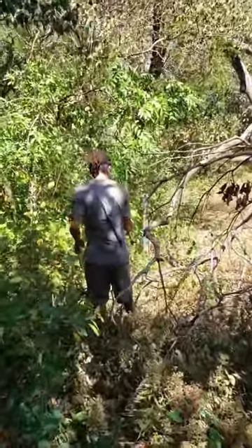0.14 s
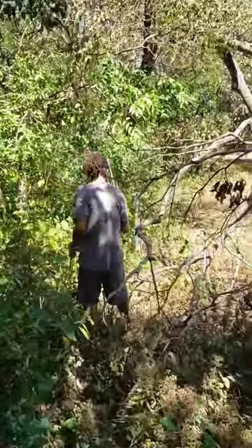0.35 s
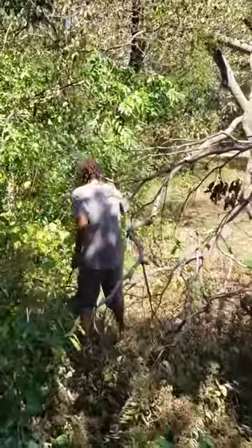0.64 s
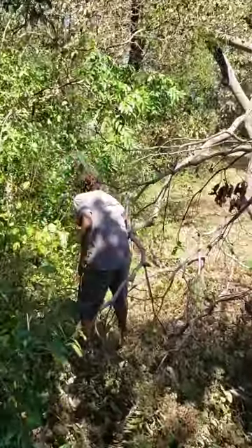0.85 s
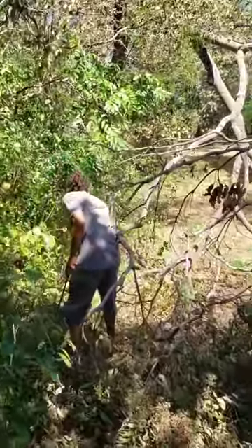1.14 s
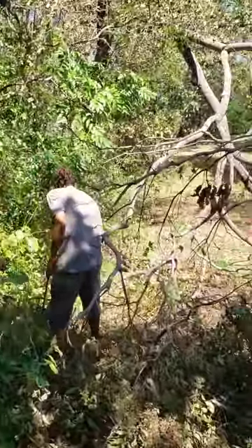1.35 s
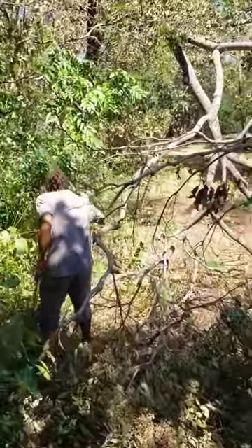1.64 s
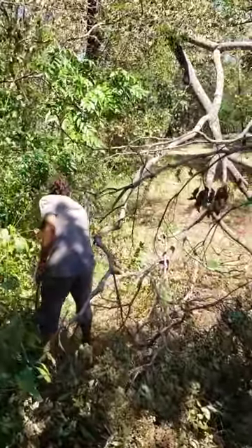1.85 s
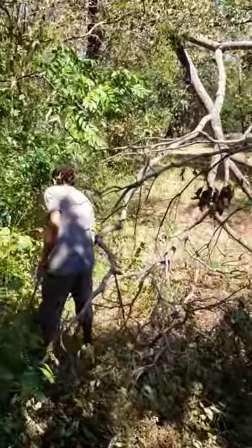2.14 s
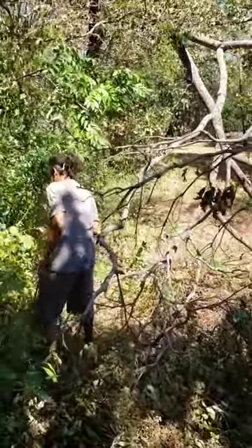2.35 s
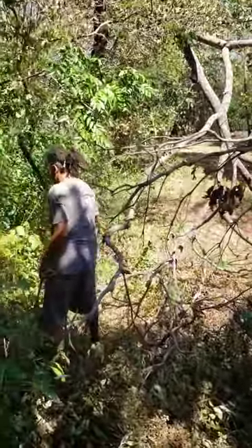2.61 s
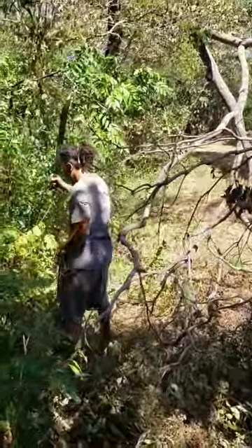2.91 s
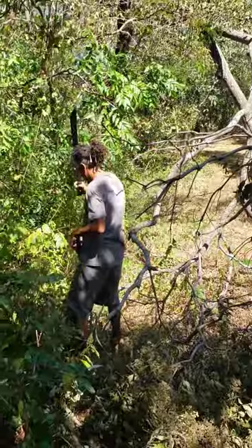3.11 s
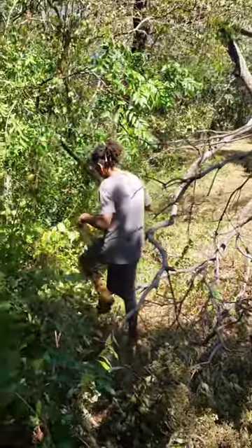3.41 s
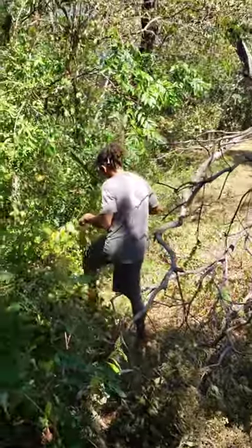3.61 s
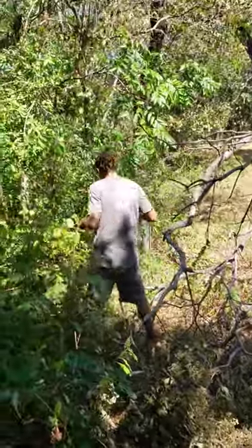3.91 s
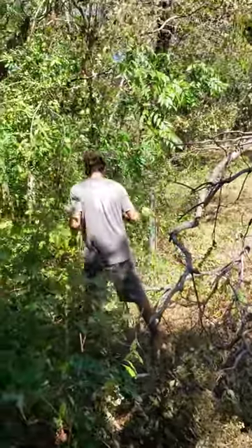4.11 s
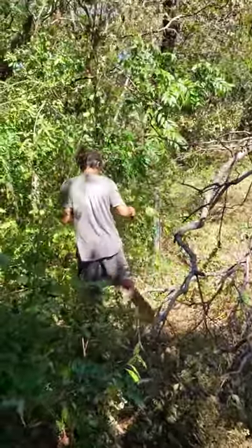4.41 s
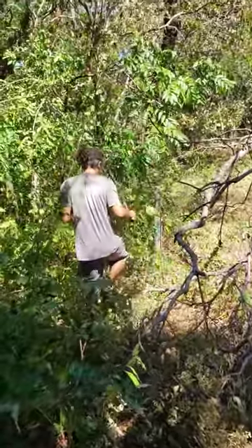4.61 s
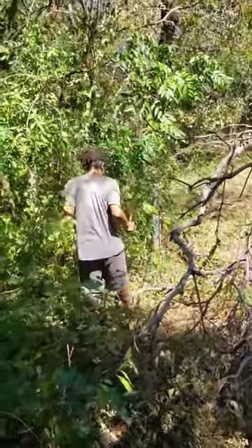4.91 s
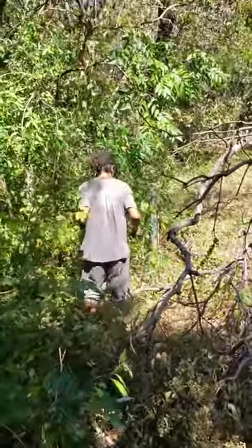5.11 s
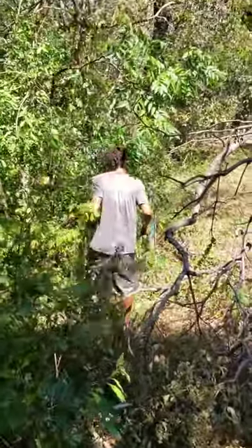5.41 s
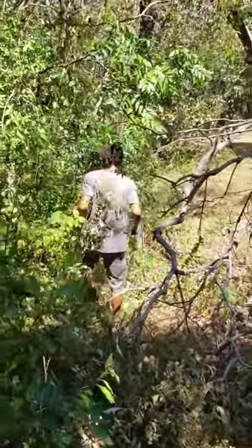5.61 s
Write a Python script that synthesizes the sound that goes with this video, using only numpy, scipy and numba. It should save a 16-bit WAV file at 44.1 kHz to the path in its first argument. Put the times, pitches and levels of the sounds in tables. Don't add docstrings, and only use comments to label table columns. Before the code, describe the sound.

A dry outdoor woodland heard through a handheld phone's two microphones, with faint airy hush and low wind buffeting, mostly on the right. From 0 to 0.8 s, leaves crunch underfoot and fine twigs tick, with one bright snap ahead near 0.15 s. A strong crunch at 0.9 s leads into a blade blow at 1.0 s: splintering crack, woody knock and low thump, with only weak metal ring. Crunching continues, peaking in a loud short burst at 1.63 s. At 1.9 s a lighter, sharper blow scatters splinters and the steel rings high and clear, its brighter part fading after about 2.4 s. It is calmer until brush and twig snaps around 3.0 to 3.1 s. Brush rustles at 3.4 s and a very sharp twig cracks at 3.73 s. From 4.2 to 5.1 s close treads crackle densely with brittle stems; another leafy crunch comes at 5.45 s, ending in small rustles and a wind bump.

```python
import sys
import numpy as np
from scipy import signal
from scipy.fft import rfft, irfft
from scipy.io import wavfile
from scipy.ndimage import uniform_filter1d
from numba import njit

SR = 44100
rng = np.random.default_rng(int(sys.argv[2]) if len(sys.argv) > 2 else 0)


def store_pcm(level_fs):
    pcm = np.round(np.clip(level_fs, -1, 1) * 32767).astype(np.int16)
    wavfile.write(sys.argv[1], SR, np.atleast_2d(pcm).T)


def makeup_ratio(level_db):
    decades = np.asarray(level_db, float) / 20
    return 10 ** decades


N = 253575
TIME = np.arange(N) / SR
LAG_BELOW, LAG_AHEAD = 22, 5


def unit(x):
    return x / np.sqrt(np.mean(x ** 2))


def colour(x, points):
    hz, db = np.transpose(points)
    grid_hz = np.linspace(1, SR / 2, 1025)
    log_gain = np.interp(np.log(grid_hz), np.log(hz), db) * np.log(10) / 20
    cepstrum = irfft(log_gain)
    cepstrum[1:1024] *= 2
    cepstrum[1025:] = 0
    response = irfft(np.exp(rfft(cepstrum)))
    return signal.fftconvolve(x, response)[:N]


def band(x, low_hz, high_hz):
    edges = [low_hz, min(high_hz, .45 * SR)]
    return signal.sosfilt(signal.butter(2, edges, "band", fs=SR, output="sos"), x)


@njit
def ring(start, hz, cycles, size, length):
    out = np.zeros(length)
    for k in range(len(start)):
        step = (2j * np.pi - np.log(1000) / cycles[k]) * hz[k] / SR
        first = int(start[k]) + 1
        z, turn = size[k] * np.exp(step * (first - start[k])), np.exp(step)
        last = first + int(cycles[k] * SR / hz[k]) + 1
        for i in range(max(first, 0), min(last, length)):
            out[i] += z.imag
            z *= turn
    return out


def heard(s, hz, cycles, size, lag, length=N):
    cycles = cycles + 0. * hz
    left = ring(s * SR + lag, hz, cycles, size, length)
    right = ring(s * SR, hz, cycles, size, length)
    return np.array([left, right])


def swells(rows, rest_db):
    s, db, rise, fall = np.transpose(rows)[:, :, None]
    t = TIME[::64]
    level = db - 20 * np.maximum((s - t) / rise, (t - s) / fall)
    power = np.sum(makeup_ratio(2 * level), axis=0) + makeup_ratio(2 * rest_db)
    return np.interp(TIME, t, 10 * np.log10(power))


def crackle(count, low_hz, high_hz, cycles, spread_db, lag, scatter):
    when, pitch, chance = rng.random((count, 3)).T
    hz = low_hz + (high_hz - low_hz) * pitch
    size = makeup_ratio(-spread_db * np.log(1.002 - chance)) * np.sqrt(hz) * rng.choice([-1, 1], count)
    lags = lag + scatter * rng.standard_normal(count)
    return unit(heard(when * N / SR, hz, cycles, size, lags))


def rustle(effort, lag, scatter, tread_hz, stalk_db, stalk_slope, thud_db, thud_slope):
    held = np.repeat(rng.standard_normal(N // 500 + 1), 500)[:N]
    flicker = unit(uniform_filter1d(held, size=400))
    leaves = crackle(count=60000, low_hz=3670, high_hz=17800, cycles=11.0, spread_db=2.5,
                     lag=lag, scatter=scatter)
    stalks = crackle(count=14000, low_hz=960, high_hz=4000, cycles=18.5, spread_db=1.0,
                     lag=lag, scatter=scatter)
    tread = crackle(count=5000, low_hz=tread_hz, high_hz=1137, cycles=4.9, spread_db=1.5,
                    lag=lag, scatter=scatter)

    def level(db, slope):
        return makeup_ratio(db + slope * (effort + 40) + 0.65 * flicker)

    return (level(-46, 1) * band(leaves, 2970, 13950)
            + level(stalk_db, stalk_slope) * band(stalks, 750, 6800)
            + level(thud_db, thud_slope) * band(tread, 0.43 * tread_hz, 1560))


def burst(s, db, centre_hz, octaves, t60, cycles, lag, count, rise=1e-4, spread_db=-0.42):
    when, pitch, chance = rng.random((count, 3)).T
    after = t60 * when ** 1.2
    hz = np.clip(centre_hz * 2 ** (octaves * (2 * pitch - 1)), 40, 16500)
    size = makeup_ratio(db - 60 * after / t60 - spread_db * np.log(1 - chance)) * rng.choice([-1, 1], count)
    size *= (1 - np.exp(-after / rise - .05)) * (hz / centre_hz) ** .5
    return s + after, hz, np.full(count, cycles), size, lag + 1.7 * rng.standard_normal(count)


def peak_at(grains, db, width):
    x = heard(*grains, length=2048)
    return x * makeup_ratio(db) / np.sqrt(uniform_filter1d(np.mean(x ** 2, axis=0), size=width).max())


def snaps(rows, lag, ms):
    out = np.zeros((2, N + 2048))
    for s, db, hz, knock_db in rows:
        crack_grains = burst(0, 0, hz, .7, ms * .0045, 10.0, lag, count=60, rise=.0004)
        crack = peak_at(crack_grains, db, width=40)
        knock_grains = burst(0, 0, 520, .8, .008, 5.0, lag, count=8)
        knock = peak_at(knock_grains, db + knock_db, width=130)
        first = int(s * SR)
        out[:, first:first + 2048] += crack + knock
    return out[:, :N]


def stray_twigs(effort, count, over_db, low_hz, high_hz):
    when, strength, pitch = rng.random((count, 3)).T
    s = when * N / SR
    db = np.interp(s, TIME, effort) + over_db + 4.0 * strength
    return list(zip(s, db, low_hz * (high_hz / low_hz) ** pitch, -18 - 22 * pitch))


def thicket(x, t60, wet_db):
    t = TIME[:SR // 4]
    tails = rng.standard_normal((2, len(t))) * makeup_ratio(-60 * t / t60) * (1 - np.exp(-t / 0.0053))
    tails /= np.sqrt(np.sum(tails ** 2, axis=1, keepdims=True))
    return x + makeup_ratio(wet_db) * signal.fftconvolve(x, tails, axes=1)[:, :N]


# (frequency [Hz], gain [dB]); the right one resonates most for sound from below
LEFT_PORT = [(100, -6), (1000, -4.5), (3000, 2), (7200, -2.5), (9000, 1), (12000, 2.5), (15500, 9.5)]
RIGHT_PORT_BELOW = [(100, -3), (2500, 2.5), (4000, 6), (6200, 3.5), (7300, -3), (9000, 0), (11600, 10.5),
                    (13300, 3.5), (15400, 22)]
RIGHT_PORT_AHEAD = [(100, -4.5), (2500, -2), (4500, 2), (6000, 6), (7300, -4), (9000, 3.5), (11000, 7.5),
                    (13300, 4.5), (15300, 13)]


def ports(x, from_below):
    right = RIGHT_PORT_BELOW if from_below else RIGHT_PORT_AHEAD
    return np.array([colour(x[0], LEFT_PORT), colour(x[1], right)])


# (frequency [Hz], spectral level [dB per Hz])
AIR_SPECTRUM = [(40, -19), (100, 1.5), (300, -6.5), (700, 2), (1500, -24), (4000, -8.5), (9000, -4.5),
                (15500, 4.5)]


def air():
    shared, left, right = (colour(n, AIR_SPECTRUM) for n in rng.standard_normal((3, N)))
    bass = makeup_ratio(16.5) * band(shared, 120, 260)
    treble = np.array([band(left, 260, 28000), band(right, 230, 21000)])
    return makeup_ratio(-67) * unit(bass + treble)


# (crest time [s], level [dB], 20 dB swell [s], 20 dB fade [s])
WIND_GUSTS = [(.06, -59, .5, .1), (.32, -46, .13, .1), (.4, -56, .2, .5), (1.0, -54, .07, .3),
              (1.1, -48, .2, .3), (1.34, -50, .07, .06), (1.71, -53, .2, .12), (1.92, -46, .05, .1),
              (2.1, -54, .03, .04), (2.19, -46.5, .03, .2), (2.45, -49.5, .05, .18), (3.09, -46, .03, .07),
              (3.27, -58.5, .04, .6), (3.92, -59, .04, .25), (5.08, -59.5, .5, .15), (5.57, -59, .03, .16),
              (5.72, -46, .06, .12)]


def wind():
    shared, left, right = (unit(band(band(n, 30, 104), 33, 184)) for n in rng.standard_normal((3, N)))
    gust = makeup_ratio(swells(WIND_GUSTS, rest_db=-68))
    at_left = makeup_ratio(-11.5) * shared + makeup_ratio(-12) * left
    at_right = makeup_ratio(-2) * shared + makeup_ratio(-14) * right
    return gust * np.array([at_left, at_right])


# (crest time [s], leaf level [dB], 20 dB swell [s], 20 dB fade [s])
TREAD_EFFORTS = [(0.0, -45, .05, .15), (.169, -33, .12, .25), (.296, -31.5, .25, .2), (.45, -45, .2, .4),
                 (.67, -50, .2, .3), (.917, -25.5, .09, .13), (1.075, -30, .2, .4), (1.194, -36, .2, .2),
                 (1.33, -35, .15, .2), (1.456, -35, .4, .11), (1.585, -30, .03, .1),
                 (1.629, -19.5, .07, .05), (1.7, -45, .1, .2), (2.0, -40, .1, .4), (2.4, -52, .5, .5),
                 (2.83, -53, .1, .3), (3.099, -33, .05, .25), (3.2, -44, .2, .5), (3.53, -52, .2, .15),
                 (4.185, -39, .15, .3), (4.286, -36, .3, .15), (4.547, -35, .2, .14), (4.663, -33, .05, .5),
                 (4.85, -40, .3, .25), (5.025, -33, .13, .12), (5.171, -39, .2, .13),
                 (5.448, -28.5, .32, .13), (5.58, -45, .2, .3)]
# (time [s], peak level [dB], centre [Hz], knock re peak [dB])
TWIGS_UNDERFOOT = [(.0688, -29, 10300, -40), (.0826, -30, 11000, -29), (.3622, -33, 9900, -40),
                   (.4353, -34, 12000, -40), (.5231, -32, 11100, -35), (.6004, -30, 7600, -36),
                   (.6533, -35, 6100, -16), (.6692, -32, 3000, -14), (.7381, -29, 11100, -31),
                   (.7653, -31, 9700, -22), (1.1287, -22, 5500, -27), (1.1975, -24, 9400, -28),
                   (1.2058, -26, 11800, -26), (1.4482, -28, 8900, -35), (1.5639, -31, 8500, -40),
                   (3.0882, -23, 9100, -15), (3.1606, -32, 4500, -32), (3.4993, -32, 6400, -27),
                   (4.2202, -31, 4300, -14), (4.2673, -30, 3400, -25), (4.281, -29, 4700, -23),
                   (4.3022, -24, 4100, -18), (4.3384, -30, 5000, -26), (4.4414, -32, 4800, -21),
                   (4.4693, -31, 3600, -11), (4.6467, -24, 5300, -25), (4.7143, -27, 4900, -27),
                   (4.8739, -28, 5700, -27), (5.0126, -25, 3700, -40), (5.0236, -24, 4700, -27)]
# (time [s], peak level [dB], centre [Hz])
MORE_TWIGS_UNDERFOOT = [(4.4057, -33, 6500), (4.4167, -35, 7300), (4.4995, -32, 7900), (4.5105, -32, 6200),
                        (4.5474, -30, 5700), (4.5833, -32, 8400), (4.601, -32, 7100), (4.6195, -34, 5100),
                        (4.6599, -27, 4700), (4.733, -30, 5500), (4.7993, -27, 8400), (4.8108, -31, 7200),
                        (4.8537, -29, 4500), (4.9041, -31, 8500), (4.945, -33, 5000), (4.9527, -30, 5200),
                        (5.0296, -23, 9100), (5.0338, -27, 5100), (5.0957, -32, 12000), (5.5097, -33, 4400)]


def treads_underfoot():
    effort = swells(TREAD_EFFORTS, rest_db=-68)
    more_twigs = [(*stem, -22) for stem in MORE_TWIGS_UNDERFOOT]
    strays = stray_twigs(effort, count=60, over_db=4.0, low_hz=4000, high_hz=11500)
    litter = rustle(effort, LAG_BELOW, 1.0, tread_hz=410, stalk_db=-55, stalk_slope=1.1,
                    thud_db=-59, thud_slope=.7)
    twigs = snaps([*TWIGS_UNDERFOOT, *more_twigs, *strays], LAG_BELOW, ms=1.9)
    return makeup_ratio(1.0) * litter + makeup_ratio(-4) * twigs


# (crest time [s], leaf level [dB], 20 dB swell [s], 20 dB fade [s])
BRUSH_PUSHES = [(.1, -43, .1, .1), (.17, -39, .1, .4), (.5, -49, .3, .3), (.785, -46, .15, .25),
                (1.1, -38, .1, .4), (1.984, -39.5, .07, .5), (2.3, -53, .5, .8), (2.585, -41, .17, .12),
                (2.74, -55, .2, .2), (2.822, -51, .05, .2), (3.03, -43, .15, .2), (3.22, -42, .2, .5),
                (3.385, -37.5, .09, .07), (3.554, -50, .2, .06), (3.637, -43, .04, .3),
                (3.741, -34.5, .09, .18), (3.829, -38, .15, .8), (4.05, -43, .4, .4), (4.39, -53, .3, .3),
                (5.0, -42, .2, .2), (5.31, -41, .13, .3), (5.44, -37, .2, .2), (5.68, -44, .1, .15),
                (5.74, -43, .09, .2)]
# (time [s], peak level [dB], centre [Hz], knock re peak [dB])
TWIGS_IN_BRUSH = [(.1576, -21, 9800, -37), (.834, -36, 9000, -30), (1.8575, -49, 9200, -40),
                  (2.5208, -42, 2700, -19), (2.5841, -28, 6000, -30), (2.6921, -39, 5700, -40),
                  (2.8116, -41, 9700, -40), (2.9523, -41, 9800, -40), (3.0042, -38, 9600, -40),
                  (3.0204, -26, 9800, -25), (3.0366, -24, 10400, -26), (3.2297, -32, 10600, -30),
                  (3.4407, -39, 11700, -40), (3.5422, -33, 10500, -40), (3.5893, -35, 8300, -31),
                  (3.644, -33, 8000, -20), (3.7333, -16, 8500, -21), (3.9024, -38, 3700, -12),
                  (4.1099, -33, 10100, -40), (5.3104, -30, 9400, -16), (5.7277, -36, 8000, -29)]


def walker_ahead():
    effort = swells(BRUSH_PUSHES, rest_db=-68)
    strays = stray_twigs(effort, count=30, over_db=4.0, low_hz=5000, high_hz=11500)
    brush = rustle(effort, LAG_AHEAD, 2.1, tread_hz=139, stalk_db=-61, stalk_slope=.95,
                   thud_db=-61, thud_slope=.55)
    twigs = snaps([*TWIGS_IN_BRUSH, *strays], LAG_AHEAD, ms=2.4)
    return makeup_ratio(5.5) * brush + makeup_ratio(-1.5) * twigs


# (time [s], splinter level [dB], splinter T60 [s], knock level [dB], thump level [dB])
BLOWS = [
    (1, -20.5, 0.19, -34.5, -25),
    (1.9007, -21, .22, -47, -34),
]


def chops():
    grains = []
    for s, splinter_db, t60, knock_db, thump_db in BLOWS:
        splinters = burst(s, splinter_db + 8, 6800, 1.2, t60, 5.06, LAG_AHEAD, count=3000,
                          rise=0.001, spread_db=0.5)
        knock = burst(s, knock_db, 760, 0.5, 0.44, 9.0, LAG_AHEAD, count=120, rise=0.0043)
        thump = burst(s, thump_db, 159.5, 0.94, 0.12, 24.0, LAG_AHEAD, count=24, rise=.008)
        grains += [splinters, knock, thump]
    return heard(*np.concatenate(grains, axis=1))


# (frequency [Hz], level [dB], T60 [s])
BLADE_MODES = [(2737, -51, 3.8), (2713, -54, 1.8), (2751, -53, 1.8), (3424, -39, .4), (3881, -44, .35),
               (4162, -33, 3.0), (4138, -36, 3.0), (4339, -44, .7), (4463, -45, .5), (4900, -42, .25),
               (5889, -44, .35)]
RING_FREEDOM = [-12, 0]


def blade():
    turn_s, turn_db_per_s = .46, -160
    out = 0
    for blow, free_db in zip(BLOWS, RING_FREEDOM):
        turned = makeup_ratio(turn_db_per_s * np.clip(TIME - blow[0] - turn_s, 0, 1))
        start = np.array([1. * blow[0]])
        for hz, db, t60 in BLADE_MODES:
            mode = heard(start, np.array([1. * hz]), t60 * hz, makeup_ratio(np.array([free_db + db])), lag=4)
            out = out + mode * (turned if hz > 3000 else 1)
    return out


def scene():
    below = thicket(treads_underfoot(), t60=0.013, wet_db=-10)
    ahead = thicket(walker_ahead() + chops(), t60=0.15, wet_db=-7) + blade() + air()
    return ports(below, from_below=True) + ports(ahead, from_below=False) + wind()


def top_cut(x):
    return signal.sosfilt(signal.butter(12, 16980, fs=SR, output="sos"), x)


def record(dry):
    thin = signal.sosfilt(signal.butter(2, 50, "high", fs=SR, output="sos"), dry)
    cut = signal.sosfilt(signal.ellip(10, .2, 60, 15900, fs=SR, output="sos"), thin)
    return top_cut(cut)


dry = scene()
out = record(dry)
store_pcm(out)
```